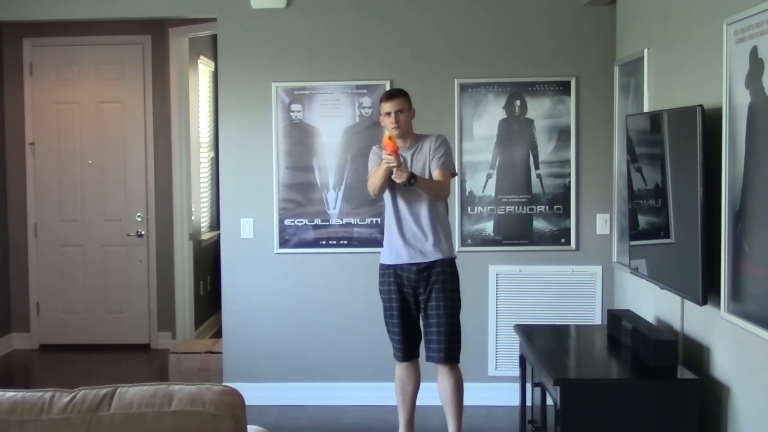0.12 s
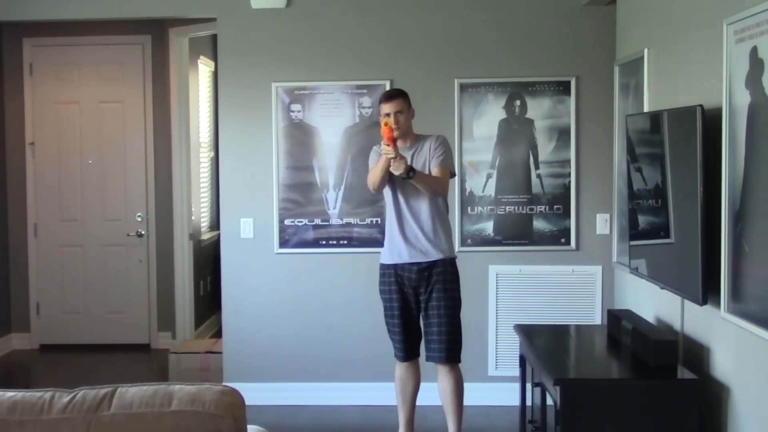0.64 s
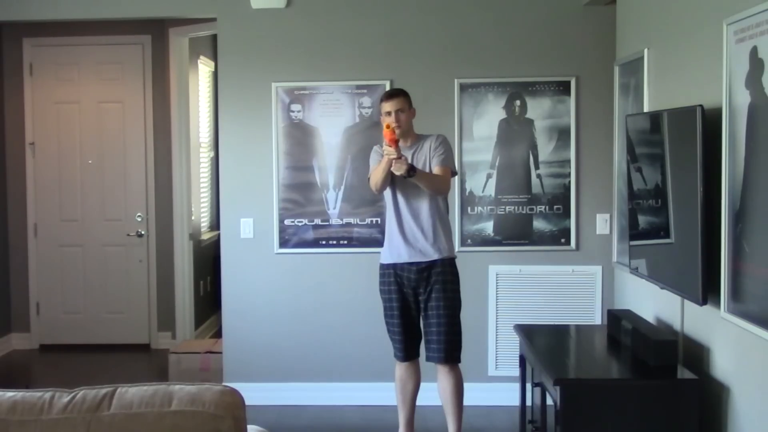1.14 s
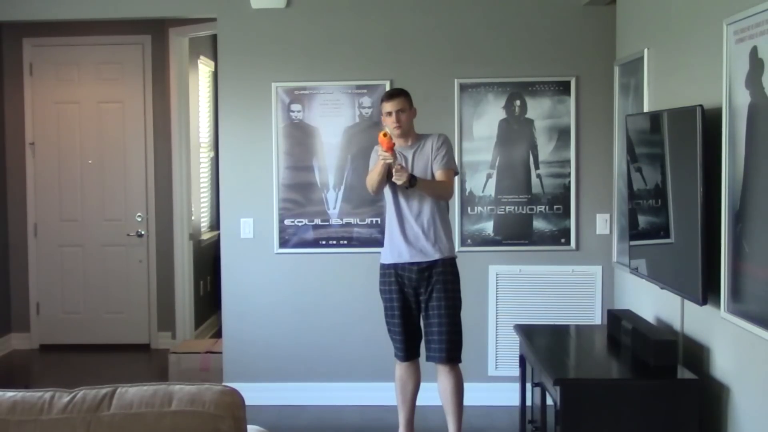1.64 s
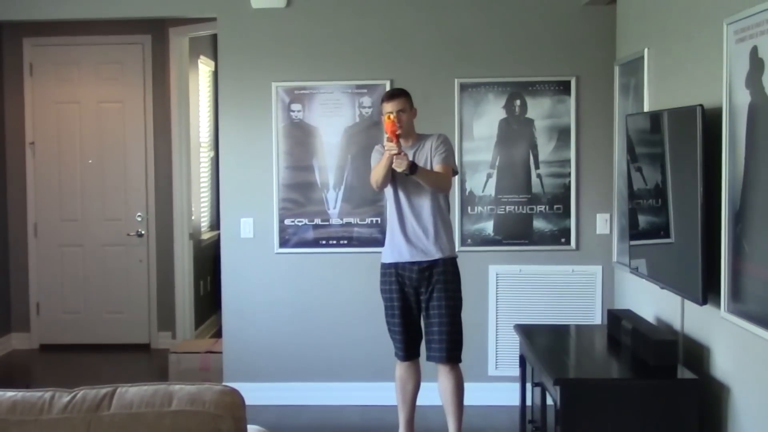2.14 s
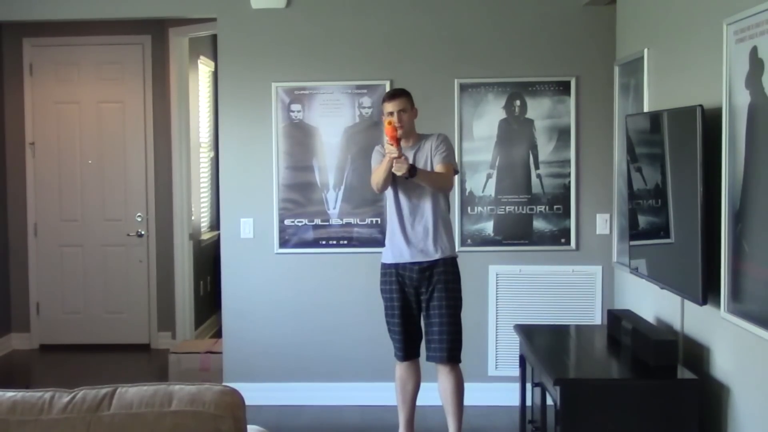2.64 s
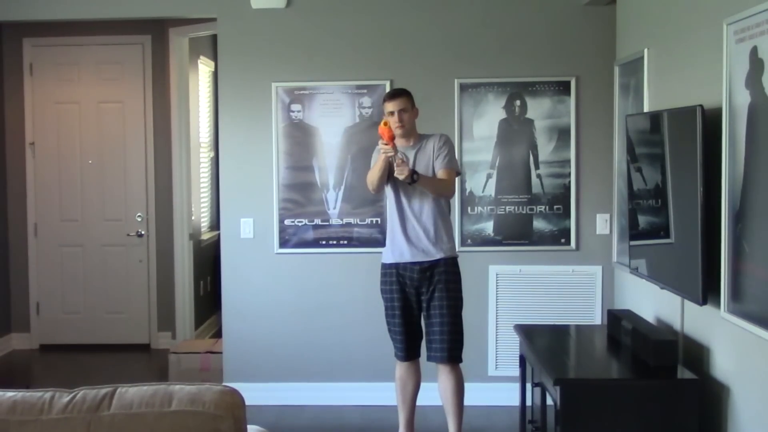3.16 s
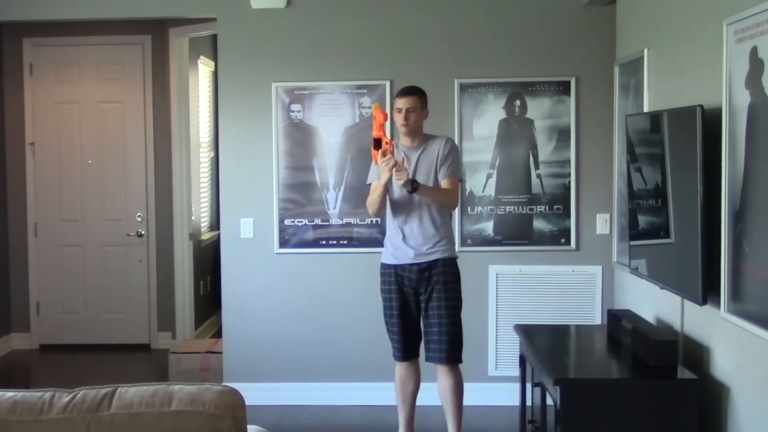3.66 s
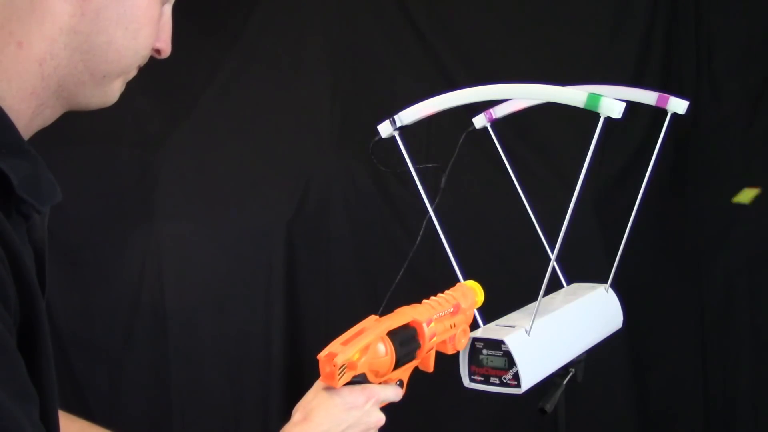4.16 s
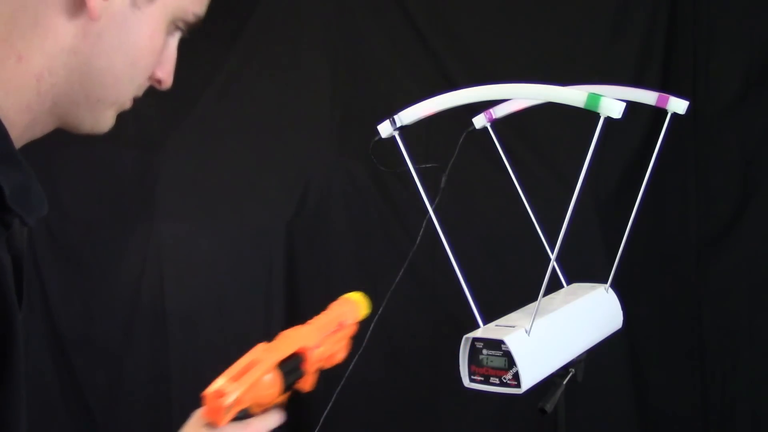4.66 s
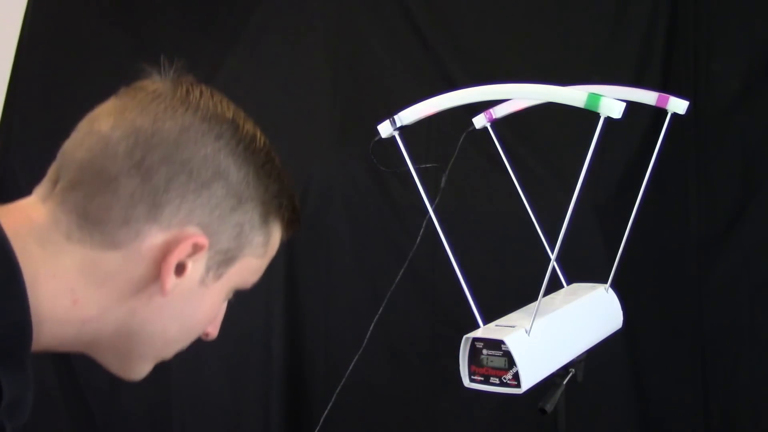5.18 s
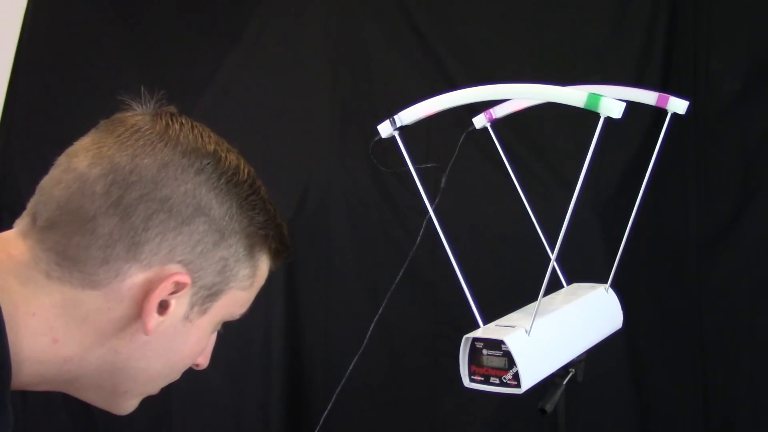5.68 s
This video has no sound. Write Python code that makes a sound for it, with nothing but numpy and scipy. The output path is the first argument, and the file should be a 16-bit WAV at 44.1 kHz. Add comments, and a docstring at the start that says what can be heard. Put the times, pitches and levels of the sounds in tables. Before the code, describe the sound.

A plastic spring dart blaster is cocked and fired four times in a lively living room, then once more up close in a drier, humming corner.

```python
"""Foam-dart blaster in two rooms

A plastic spring blaster is fired, re-cocked and fired again across a lively living room; foam darts land nearby.
Then the sound switches to one more shot, close by in a draped corner, over the drone of the ventilation.
Each contact is a short rattle of clicks, coloured by what is struck and heard direct and as reflections.
The air is shaped noise with hum lines; the corner adds a faint, flickering whistle."""
import sys
import numpy as np
from scipy import signal
from scipy.fft import irfft
from scipy.io import wavfile
from scipy.ndimage import uniform_filter1d

SR = 44100
rng = np.random.default_rng(int(sys.argv[2]) if len(sys.argv) > 2 else 0)


def store_wav(level_fs):
    """Save 16-bit WAV to argv[1]."""
    pcm = np.round(np.clip(np.atleast_2d(level_fs), -1, 1) * 32767)
    wavfile.write(sys.argv[1], SR, pcm.T.astype(np.int16))


def level_to_linear(level):
    """Convert decibel levels to linear amplitude factors, elementwise."""
    exponent = np.asarray(level, float) / 20
    return 10 ** exponent


N = 255780  # length [samples]
CUT_S = 3.753  # the living room gives way to the corner [s]


def evened(x):
    """Scales a sound to an rms of 1."""
    return x / np.sqrt(np.mean(x ** 2) + 1e-20)


def read(points, hz):
    """Reads a table of (frequency [Hz], value) at any frequency, evenly along pitch."""
    f, value = np.transpose(points)
    return np.interp(np.log(hz + 1), np.log(f + 1), value)


def add(mix, start_s, sound):
    """Adds a sound into the mix, cut off where the mix ends."""
    part = mix[round(start_s * SR):][:len(sound)]
    part += sound[:len(part)]


def causal(db):
    """Impulse response with the given dB per frequency bin and no sound before the blow (minimum phase)."""
    log_gain = np.log(level_to_linear(np.maximum(db, -100)))
    mirrored = np.r_[log_gain, log_gain[-2:0:-1]]
    phase = -signal.hilbert(mirrored).imag[:len(db)]
    return irfft(np.exp(log_gain + 1j * phase))


def tails(decays, rise_s, count=8):
    """Sparse reflections of random sign that build up, each band dying at its own speed; energy 1."""
    slots = np.arange(120, SR - 12, 12)  # one reflection in every 12 samples
    at = slots + rng.integers(0, 12, (count, len(slots)))
    taps = np.zeros((count, SR))
    np.put_along_axis(taps, at, rng.choice([-1., 1.], at.shape), 1)
    hz, t, bands = signal.stft(taps, SR, nperseg=256)
    fading = level_to_linear(-60 * t / read(decays, hz)[:, None])
    tail = signal.istft(bands * fading, SR, nperseg=256)[1][:, :SR]
    tail = tail * (1 - np.exp(-np.arange(SR) / SR / rise_s))
    return tail / np.linalg.norm(tail, axis=1)[:, None]


def both_rooms():
    """Reflections of the lively living room and of the draped corner, which fall silent sooner."""
    # how long each band takes to fall by 60 dB: (frequency [Hz], time [s])
    living_decay = [(150, 0.41), (500, 0.56), (1500, 0.61), (4000, 0.54), (8000, 0.48), (14000, 0.29)]
    corner_decay = [(150, 0.22), (500, 0.41), (1500, 0.23), (4000, 0.21), (8000, 0.17), (14000, .12)]
    return tails(living_decay, rise_s=0.00068), tails(corner_decay, rise_s=0.0019)


def shell(ring_db):
    """A dry click and the ringing of the hollow plastic shell, as hard as this contact shakes it."""
    # ringing of the shell: (frequency [Hz], relative level [dB], time to fall by 60 dB [s])
    rings = [(737, -5.5, 0.029), (1077, -14, 0.085), (1456, -8.5, 0.01), (1596, -12.5, 0.093),
             (1820, -9.5, 0.011), (2294, -9, 0.0055), (3083, -13, 0.0064), (3930, -20.5, 0.11),
             (6390, -16.5, 0.055), (9600, -40, 0.01484), (11570, -12, .02)]
    t = np.arange(4000) / SR
    ringing = np.zeros(len(t))
    for hz, db, t60 in rings:
        even_energy = np.sqrt(np.log(1000) / t60 / SR)  # long and short rings start from equal energy
        ringing += level_to_linear(db - 60 * t / t60) * np.sin(2 * np.pi * hz * t) * even_energy
    return level_to_linear(ring_db) * ringing + (t == 0)


def blows(rows, tone, body, rooms, spread_db=1):
    """Each blow is a rattle of uneven clicks, coloured by contact and body, heard direct and through its room.

    rows: (time [s], level of the loudest 7 ms [dB], bass lift [dB], treble lift [dB],
    direct over room [dB], rattle length [s])."""
    bass_hz, treble_hz = 406, 2800  # where the lifts set in
    colour_shift = .04  # the colour moves at random by up to this share, up or down
    out = np.zeros(N)
    hz = np.fft.rfftfreq(4096, 1 / SR)
    t = np.arange(4000) / SR
    for start_s, db, bass_db, treble_db, direct_db, length_s in rows:
        size = np.minimum(rng.exponential(1, len(t)), 3)
        sign = rng.standard_normal(len(t))
        pick = rng.random()
        swell_and_fade = (t / length_s) ** .5 * np.exp(-2 * t / length_s)
        rattle = sign * level_to_linear(spread_db * size) * swell_and_fade
        lift_db = bass_db / (1 + (hz / bass_hz) ** 4) + treble_db / (1 + (treble_hz / (hz + 1)) ** 2)
        colour_db = read(tone, hz * (1 + colour_shift * (2 * pick - 1)))
        click = signal.fftconvolve(body, causal(colour_db + lift_db))
        # reflections gather the clicks from all sides: the mean colour, swelling while the rattle lasts
        room = rooms[int(start_s > CUT_S)]
        heard = signal.fftconvolve(click, room[int(pick * len(room))])
        heard = heard * (1 - np.exp(-np.arange(len(heard)) / SR / length_s))
        direct = signal.fftconvolve(click, rattle / np.linalg.norm(rattle))
        add(heard, 0, level_to_linear(direct_db) * direct)
        loudest = np.sqrt(uniform_filter1d(heard ** 2, 300).max())
        end = max(round((CUT_S - start_s) * SR), 0) or None  # the living room's tails stop at the switch
        add(out, start_s, (level_to_linear(db) * heard / loudest)[:end])
    return out


def nearer(rows):
    """In the corner the blaster is close: brighter and drier."""
    treble_gain_db, direct_gain_db = 6, 9
    return [(s, db, bass_db, treble_db + treble_gain_db * (s > CUT_S),
             direct_db + direct_gain_db * (s > CUT_S), length)
            for s, db, bass_db, treble_db, direct_db, length in rows]


def firing(rooms):
    """The catch lets go, the spring drives the plunger home with a slam, and twice it rebounds."""
    # shots: (catch time [s], plunger travel [s], slam level [dB], slam bass lift [dB],
    # slam treble lift before any closeness [dB])
    shots = [(0.5314, 0.0059, -14, 13, 1.5), (1.3679, 0.0082, -14, 16, 4.5), (2.152, 0.0096, -15, 16, 3),
             (2.924, .005, -11, -1, 0.5), (4.1365, 0.0036, -12.5, 15.5, 4)]
    # plunger rebounds: (time [s], level [dB], bass lift [dB])
    rebounds = [(0.571, -20, 1), (2.985, -19, 9)]
    # colour of the shot: (frequency [Hz], level [dB])
    shot_tone = [(110, -27), (170, -10), (330, -11.5), (480, -4), (640, 1.5), (950, 4), (1200, 0),
                 (1400, 0.5), (1750, 3.5), (2200, -1.5), (4000, -6), (7000, -13), (11000, -21.5),
                 (16000, -37)]
    rows = []
    for s, travel, db, bass_db, treble_db in shots:
        # the catch is softer, thinner and brighter than the slam that follows
        rows.append((s, db - 3.5, bass_db - 7.5, treble_db + 2.5, -7, 0.0074))
        rows.append((s + travel, db, bass_db, treble_db, -4, .006))
    rows += [(s, db, bass_db, -10.5, 3, 0.0061) for s, db, bass_db in rebounds]
    return blows(nearer(rows), shot_tone, shell(ring_db=-18), rooms)


def puff(rooms):
    """Close by, air pops from the barrel behind the dart: a low, short burst without shell ringing."""
    # colour of the pop: (frequency [Hz], level [dB])
    puff_tone = [(120, -33), (220, -10), (330, 3), (480, -5.5), (900, -29.5), (3000, -59)]
    return blows([(4.141, -21, 0, 0, 3, .006)], puff_tone, [1.], rooms, spread_db=2)


def trigger(rooms):
    """The trigger springs back and clicks against the ringing shell."""
    # clicks: (time [s], level [dB])
    clicks = [(.722, -21.5), (1.572, -21), (2.362, -21.5), (3.129, -23.5), (4.5927, -25), (4.5971, -22),
              (4.602, -28)]
    # colour of the click: (frequency [Hz], level [dB])
    trigger_tone = [(350, -59.5), (600, -16), (1240, -3), (1570, 3.5), (2200, 3.5), (2760, -4.5),
                    (3830, 7.5), (4780, -6.5), (6120, -6), (11200, -18.5), (16000, -33.5)]
    rows = [(s, db, -4, 2, -4, 0.0045) for s, db in clicks]
    return blows(nearer(rows), trigger_tone, shell(ring_db=-4), rooms)


def hauling(rooms):
    """The slide is hauled back: each pull passes the same ratchet ticks and ends as the spring latches."""
    # pulls: (start [s], length [s], level before each step's own change [dB]); the first began before time zero
    pulls = [(-.029, 0.03, -14), (0.817, .032, -17.5), (1.643, 0.03, -17.5), (2.417, .031, -17.5),
             (3.186, .027, -17.5)]
    # steps of a pull: (share of its length, level change [dB], bass lift [dB],
    # direct over room [dB], rattle length [s])
    steps = [(0, -7, -15, -2.5, 0.009), (.57, -1.5, -11.5, -5, 0.0057), (1, 0.6, 4, -5.5, 0.0043)]
    # colour of the ticks: (frequency [Hz], level [dB])
    cocking_tone = [(200, -28.5), (450, -23), (640, -7), (730, 2.5), (830, 1.5), (1050, -5), (1580, 0.5),
                    (2000, 1.5), (3000, 3.5), (6000, 0.5), (10000, -8), (16000, -24.5)]
    treble_db = 3.5
    rows = []
    for s, length, db in pulls:
        for share, step_db, bass_db, direct_db, rattle in steps:
            time_s = s + share * length
            if time_s >= 0:
                rows.append((time_s, db + step_db, bass_db, treble_db, direct_db, rattle))
    return blows(rows, cocking_tone, shell(ring_db=-3.5), rooms, spread_db=3)


def returning(rooms):
    """The slide runs forward: a light first touch, then a firmer knock at its stop."""
    # returns: (touch time [s], gap until the stop [s], level at the stop [dB])
    returns = [(.255, 0.0084, -30), (1.101, 0.014, -29.5), (1.887, 0.049, -27.5), (2.705, .013, -28.5),
               (3.489, 0.018, -29)]
    # colour of the knock: (frequency [Hz], level [dB])
    return_tone = [(180, -65), (300, -11.5), (511, -22.5), (814, 0.5), (946, -9.5), (1280, -7.5),
                   (3190, -4.5), (11300, -23.5), (16000, -37)]
    bass_db, touch_db = -0.5, -7  # touch_db: the touch against the stop
    rows = [(s, db + touch_db, bass_db, 4, -6, 0.01) for s, gap, db in returns]
    rows += [(s + gap, db, bass_db, 2.9, -1.5, 0.012) for s, gap, db in returns]
    return blows(rows, return_tone, shell(ring_db=-10), rooms, spread_db=8)


def darts(rooms):
    """Soft foam has no ring of its own: only the colour of what it strikes."""
    # thuds into something padded: (time [s], level [dB], rattle length [s])
    thuds = [(0.264, -28.5, 0.0044), (0.721, -30.5, 0.0026), (0.754, -20.5, 0.012), (0.766, -17.5, 0.0094)]
    # one dart smacks a panel nearby and rebounds: (time [s], level [dB], rattle length [s])
    smacks = [(1.844, -10.5, 0.00096), (1.849, -11.5, 0.0029)]
    # taps on hard furniture and floor: (time [s], level [dB])
    taps = [(1.197, -30), (1.209, -24.5), (2.826, -27.5), (2.845, -31.5), (2.865, -34), (2.889, -34)]
    # close by, the dart clatters off hard parts and small things tick: (time [s], level [dB], treble lift [dB])
    clatter = [(4.2173, -17.5, 17), (4.2244, -23, 6), (4.284, -28, -2), (4.2892, -29.5, -3),
               (4.3025, -30.5, -1), (4.335, -38.5, -4), (4.437, -49, -15), (4.571, -38, 22),
               (4.935, -61.5, 3.5), (5.1998, -59, 9), (5.2698, -61.5, 3), (5.4284, -65, 1)]
    # colours of what is struck: (frequency [Hz], level [dB])
    thud_tone = [(90, -40), (140, -14), (200, -7), (300, -2), (500, 0), (800, -4), (1050, -14), (1500, -24),
                 (3000, -38), (16000, -75)]
    smack_tone = [(110, -18.5), (200, -8.5), (400, -6), (700, -0.5), (1000, -3.5), (1400, -6), (1750, -3.5),
                  (2500, -12), (3200, -22), (5000, -25), (9000, -32), (16000, -62)]
    tap_tone = [(150, -22), (400, -15), (740, -6), (1050, -9), (1400, -5), (1700, 1), (1950, -6),
                (2300, -18), (3200, -25), (6000, -27), (8200, -21), (10000, -33), (16000, -55)]
    clatter_tone = [(350, -45), (600, -10), (1850, -3), (2500, -8), (3730, -6.5), (4910, -20), (5950, -15),
                    (6830, -15), (13000, -33), (16000, -44)]
    kinds = [([(s, db, 1.5, -2.5, -2.5, length) for s, db, length in thuds], thud_tone),
             ([(s, db, 2.2, 2.2, -2.5, length) for s, db, length in smacks], smack_tone),
             ([(s, db, 1.5, 3, -3.5, .004) for s, db in taps], tap_tone),
             ([(s, db, 3, treble_db, 4, .0033) for s, db, treble_db in clatter], clatter_tone)]
    return sum(blows(rows, tone, [1.], rooms) for rows, tone in kinds)


def whistle():
    """A thin, faint tone that comes and goes at random in the corner."""
    whistle_hz, level_db = 5561, -73
    chances_per_s, on_above = 14, .6  # at each chance a random draw above on_above turns the tone on
    t = np.arange(N) / SR
    draws = rng.standard_normal(int(N / SR * chances_per_s) + 2)
    on = (draws[(t * chances_per_s).astype(int)] > on_above) & (t > CUT_S)
    soft_switch = uniform_filter1d(on * 1., size=400)
    return level_to_linear(level_db) * soft_switch * np.sin(2 * np.pi * whistle_hz * t)


def air(tone, air_db, hum, patchy_db=.8):
    """Room noise with drifting patches, and hum lines that are partly steady, partly narrow noise."""
    frames, hz = N // 512 + 5, np.fft.rfftfreq(2048, 1 / SR)
    real, imaginary, patches = rng.standard_normal((frames, len(hz), 3)).T
    patches = uniform_filter1d(patches, size=16, axis=0)  # along frequency
    patches = evened(uniform_filter1d(patches, size=8, axis=1))  # along time
    gain = level_to_linear(read(tone, hz)[:, None] + patchy_db * patches)
    noise = signal.istft((real + 1j * imaginary) * gain, nperseg=2048, noverlap=1536)[1]
    out = level_to_linear(air_db) * evened(noise[:N])
    t = np.arange(N) / SR
    for line_hz, width, db, share in hum:
        r = np.exp(-np.pi * width / SR)
        waver = signal.lfilter([1], [1, -2 * r, r * r], rng.standard_normal((N, 2)) @ [1, 1j])
        strength = 1 - share + share * waver / waver.std()
        out = out + level_to_linear(db) * evened((strength * np.exp(2j * np.pi * line_hz * t)).real)
    return out


def room_air():
    """The quiet air of the living room, then the ventilation's drone in the corner."""
    # colour of the air: (frequency [Hz], level [dB])
    living_tone = [(20, -54), (40, -50), (62, -26.5), (105, -11.5), (135, -5.5), (200, -2), (420, 2),
                   (800, -4), (1500, -10.5), (3000, -21), (7000, -26.5), (16000, -50)]
    corner_tone = [(20, -52), (40, -41), (62, -30), (105, -13), (135, -12.5), (250, 0), (310, -5),
                   (486, -4), (570, -10.5), (890, -12.5), (1320, -19.5), (5740, -38.5), (16000, -60)]
    # hum lines: (frequency [Hz], width of each of two smoothing stages [Hz], rms level [dB], wavering share [0-1])
    living_hum = [(120, 3, -63, .12), (415, 15, -60, .8)]
    corner_hum = [(150, 8, -53, .35), (242, 6, -52.5, .35), (269, 8, -53, .4), (385, 12, -61, .8),
                  (480, 8, -57, .4)]
    living = air(living_tone, -43, living_hum)
    corner = air(corner_tone, -46.5, corner_hum)
    return np.where(np.arange(N) / SR < CUT_S, living, corner)


def scene():
    """Blaster, darts and the air of both rooms."""
    rooms = both_rooms()
    blaster = firing(rooms) + puff(rooms) + trigger(rooms) + hauling(rooms) + returning(rooms)
    # a low cut at 126 Hz takes the deep bass out of the hits
    low_cut = signal.butter(5, 126, "highpass", fs=SR, output="sos")
    hits = signal.sosfilt(low_cut, blaster + darts(rooms))
    return (hits + whistle() + room_air())[None]


def roll_off(x):
    """The treble ends steeply here."""
    return signal.sosfilt(signal.butter(12, 16440, fs=SR, output="sos"), x)


def record(dry):
    """The input stage rounds off the loudest peaks, a little lopsided; then the top treble is cut."""
    ceiling, lopsided = .9, .03
    rounded = ceiling * np.tanh(dry / ceiling)
    rounded = rounded - lopsided * rounded ** 4
    treble_cut = signal.firwin(255, 15900, fs=SR)[None]  # edge at 15900 Hz
    mix = signal.oaconvolve(rounded, treble_cut, "same")
    return roll_off(mix)


dry = scene()
out = record(dry)
store_wav(out)
```